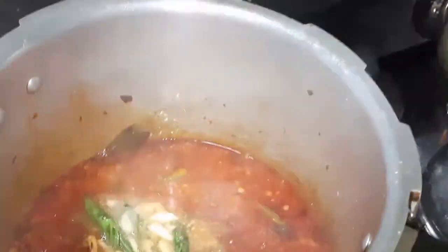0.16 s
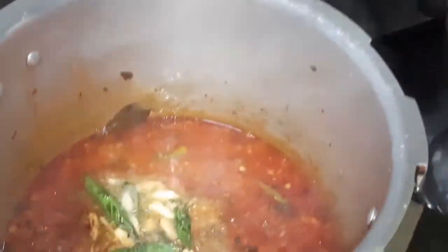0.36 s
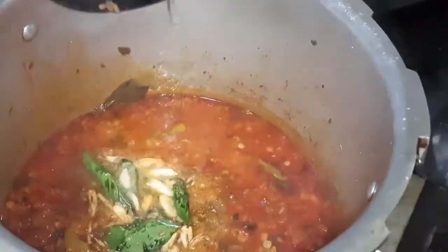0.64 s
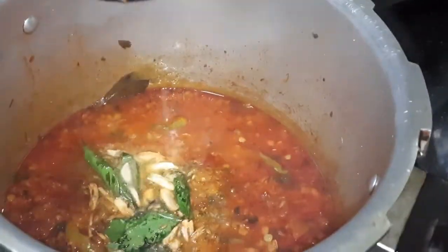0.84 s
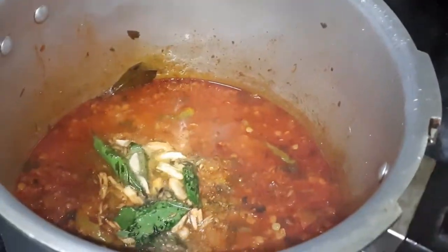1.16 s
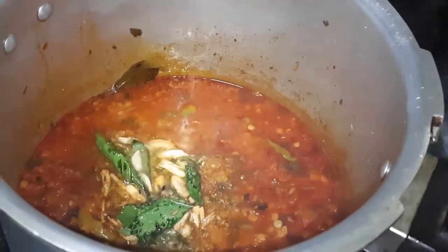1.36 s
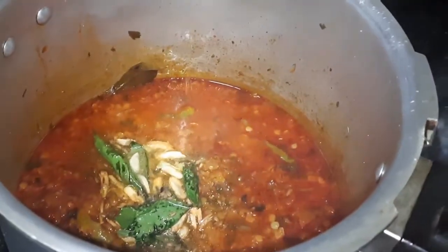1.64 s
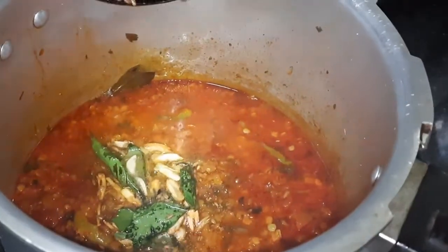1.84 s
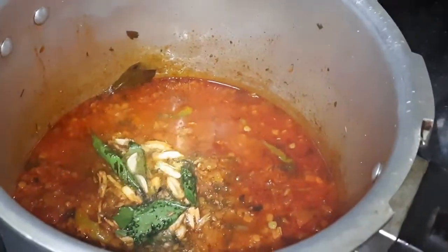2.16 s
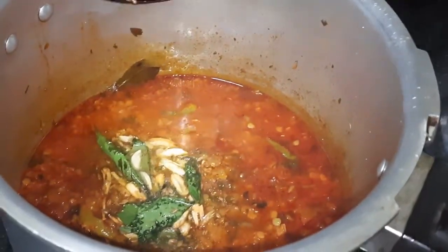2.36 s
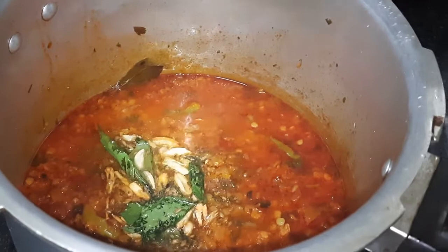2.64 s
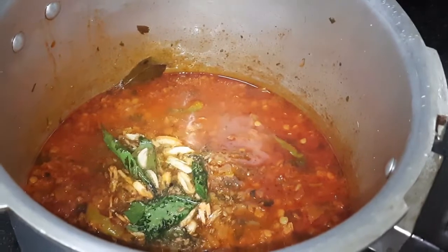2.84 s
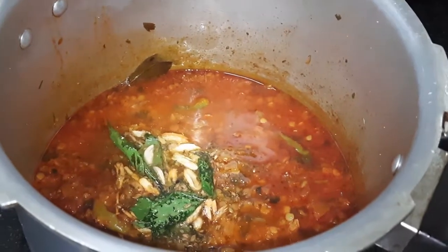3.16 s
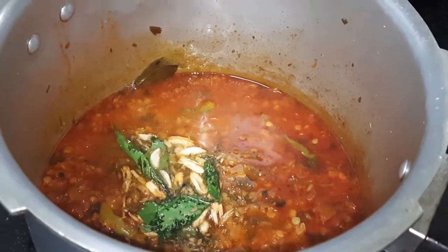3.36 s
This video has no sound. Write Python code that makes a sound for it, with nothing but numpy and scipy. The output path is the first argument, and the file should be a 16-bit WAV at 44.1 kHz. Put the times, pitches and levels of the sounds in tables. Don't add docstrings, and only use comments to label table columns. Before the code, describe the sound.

Hot oil hits wet lentils in a deep metal pot with a loud, bright sizzle, weakening steadily into scattered crackles and tiny pops; a light tap on the pot midway, close phone microphone, quiet home kitchen.

```python
import sys
import numpy as np
from scipy import signal
from scipy.fft import rfft, irfft, next_fast_len
from scipy.io import wavfile
from scipy.ndimage import uniform_filter1d, map_coordinates

SR = 44100
rng = np.random.default_rng(int(sys.argv[2]) if len(sys.argv) > 2 else 0)


def inscribe(sig):
    pcm = np.round(np.clip(np.atleast_2d(sig).T, -1, 1) * 32767)
    wavfile.write(sys.argv[1], SR, pcm.astype(np.int16))


def decibels_to_gain(level_db):
    exponent = np.asarray(level_db, float) / 20
    return 10 ** exponent


N = 154350


def unit(x):
    return x / np.sqrt(np.mean(x ** 2) + 1e-20)


def along(points, hz):
    f, v = np.transpose(points)
    return np.interp(np.log(hz + 1), np.log(f + 1), v)


def wobble(rate):
    knots = rng.standard_normal(int(N * rate / SR) + 4)
    return map_coordinates(knots, [np.arange(N) * rate / SR])


def coloured(x, points, peaks=()):
    m = 2 * next_fast_len(N // 2 + SR // 4)
    hz = np.fft.rfftfreq(m, 1 / SR)
    resonances = sum(decibels_to_gain(2 * db) / (1 + (2 * (hz - c) / w) ** 2) for c, w, db in peaks)
    gain = decibels_to_gain(along(points, hz)) * np.sqrt(1 + resonances)
    cepstrum = irfft(np.log(gain + 1e-7), m)
    cepstrum = np.concatenate([cepstrum[:1], 2 * cepstrum[1:m // 2], np.zeros(m // 2)])
    return irfft(rfft(x, m) * np.exp(rfft(cepstrum)), m)[..., :N]


# (time [s], fizz level [dB], large bursts over the fizz [dB], low glug over the fizz [dB])
BOIL = [(0, -31.5, -11, -24), (.1, -31.5, -12.5, -26), (.3, -32.5, -12, -26), (.5, -34.5, -14.5, -33),
        (.7, -33.5, -16, -32), (.85, -33.5, -14, -27.5), (1.05, -36, -16.5, -32), (1.3, -39, -23, -28),
        (1.6, -41.5, -23.5, -29), (1.761, -45, -22, -25.5), (1.86, -44.5, -16.5, -23),
        (2.02, -45.5, -28, -27), (2.35, -51.5, -21, -22), (2.47, -51.5, -33, -27),
        (2.62, -52.5, -21, -27.5), (2.8, -56, -19.5, -23.5), (3.1, -60, -19, -21), (3.5, -65, -23, -17.5)]
# (frequency [Hz], spectral density [dB per Hz])
GURGLE_COLOUR = [(700, -31), (1000, -14.5), (1600, -8), (2300, -4.5), (2880, -4.5), (3500, -3), (6000, -6),
                 (14000, -70)]
# (frequency [Hz], spectral density [dB per Hz])
GLUG_COLOUR = [(200, -16.5), (400, -2.5), (600, -7.5), (800, -8), (1300, -9.5), (2500, -37.5)]
# (frequency [Hz], width [Hz], level over the burst [dB])
POT = [(475, 22, 12), (575, 30, 14), (650, 45, 8), (950, 50, 7), (1225, 50, 11), (1950, 40, 11),
       (2070, 45, 8), (2345, 35, 13), (2600, 55, 11), (3300, 80, 6), (3720, 55, 8)]


def sizzle():
    s, *controls = np.transpose(BOIL)
    level_db, large_db, glug_db = (np.interp(np.arange(N) / SR, s, c) for c in controls)
    level_db = level_db + 0.5 * wobble(8.24) + 0.32 * wobble(29.98)
    large_db = large_db + 0.6 * wobble(11.6)

    bead_share = 0.12
    steam = bursts(per_s=2500, spread_db=-3.5, share=0.23, patchy_db=0.64)
    steam = steam + np.sqrt(bead_share) * beads()
    fizz = oil_colour(unit(steam), [(c, w, db - 5.5) for c, w, db in POT])

    large = bursts(per_s=500, spread_db=-3, share=0.22, patchy_db=1.2)
    gurgle = unit(coloured(large, GURGLE_COLOUR, POT))

    slow = bursts(per_s=200, spread_db=6.5, share=0.08, patchy_db=1.0)
    glug = unit(coloured(slow, GLUG_COLOUR, POT))
    return decibels_to_gain(level_db) * (fizz + decibels_to_gain(large_db) * gurgle + decibels_to_gain(glug_db) * glug)


def bursts(per_s, spread_db, share, patchy_db):
    chance, size, sign = rng.random(N), rng.exponential(1, N), rng.standard_normal(N)
    shots = (chance < per_s / SR) * decibels_to_gain(spread_db * np.minimum(size, 4)) * sign
    steam = np.sqrt(share) * unit(shots) + np.sqrt(1 - share) * rng.standard_normal(N)
    z = signal.stft(steam, nperseg=256)[2]
    field = uniform_filter1d(rng.standard_normal(z.shape), size=8, axis=0)
    field = uniform_filter1d(field, size=6, axis=1)
    return signal.istft(z * decibels_to_gain(patchy_db * unit(field)), nperseg=256)[1][:N]


def beads():
    count = round(2200 * N / SR)
    when, pitch, size = rng.random(count), rng.standard_normal(count), rng.exponential(1, count)
    hz = np.clip(7000 * np.exp(0.4 * pitch), 2000, 14000)[:, None]
    k = np.arange(SR // 200)
    turns = hz * k / SR
    envelope = np.exp(-turns / 10) * (1 - np.exp(-turns))
    ring = decibels_to_gain(2.4 * np.minimum(size, 3))[:, None] * np.sin(2 * np.pi * turns) * envelope
    place = (when * N).astype(int)[:, None] + k
    return unit(np.bincount(place.ravel(), ring.ravel())[:N])


# (frequency [Hz], spectral density [dB per Hz])
HOT_OIL = [(1470, -31), (2500, -24), (2930, -19), (3750, -8.5), (4110, -9.5), (6900, -5.5), (7570, -5),
           (9370, 4), (15500, -15)]
# (frequency [Hz], spectral density [dB per Hz])
COOL_OIL = [(1500, -34), (2500, -33), (3900, -15.5), (6000, -11), (9300, 0), (11300, -6.5), (11900, -22),
            (15600, -26)]


def oil_colour(x, peaks=()):
    half_way_s, cooling_s = 2.44, 0.24
    cooled = 1 / (1 + np.exp((half_way_s - np.arange(N) / SR) / cooling_s))
    pair = np.array([x, rng.standard_normal(N)])
    hot, cool = (coloured(pair, colour, peaks) for colour in (HOT_OIL, COOL_OIL))
    return (1 - cooled) * hot[0] / hot[1].std() + cooled * cool[0] / cool[1].std()


# (time [s], crack peak [dB], crackle under the crack [dB], decay time [s])
SPITS = [(0.3865, -21, -10, 0.028), (0.638, -31, -30, 0.0057), (1.234, -28.5, -11, 0.022),
         (1.2996, -26, -11, 0.015), (1.406, -28, -9, 0.012), (1.5569, -20.5, -13, 0.0082),
         (1.798, -38.5, -0.5, 0.041), (1.8694, -34.5, -5.5, 0.011), (1.93, -27.5, -18, 0.029),
         (2.1411, -31, -6, 0.017), (2.508, -24, -19, 0.052), (2.5439, -29, -8, 0.019),
         (2.575, -44.5, -1, .04), (2.6594, -41, -21, 0.009), (2.7376, -42.5, -6.5, 0.015),
         (2.8032, -36, -35.5, 0.015), (2.9612, -33.5, -26, 0.014), (3.012, -40, -25, 0.013),
         (3.0338, -41, -19, 0.021), (3.077, -38, -14, 0.017), (3.149, -43.5, -12, 0.021),
         (3.283, -46, -12, 0.0079), (3.346, -39, -20, 0.01), (3.4345, -47, -15, 0.013)]
# (frequency [Hz], level [dB])
SPIT_TILT = [(1500, 2), (3800, 2), (5500, 4), (8500, 0), (15000, 1.5)]


def spits():
    x, t = np.zeros(N + SR), np.arange(SR // 5) / SR
    crack = 0.7 * np.cos(2 * np.pi * 9200 * t) * np.exp(-t / 0.0003)
    for s, db, crackle_db, decay_s in SPITS:
        noise = rng.standard_normal(len(t))
        steps_db = 4 * rng.standard_normal(len(t) // 30 + 1)
        crackle = noise * decibels_to_gain(steps_db.repeat(30)[:len(t)]) * np.exp(-t / decay_s)
        x[round(s * SR):][:len(t)] += decibels_to_gain(db) * (crack + decibels_to_gain(crackle_db) * crackle)
    return decibels_to_gain(-5.5) * oil_colour(coloured(x[:N], SPIT_TILT), [(c, w, db - 5) for c, w, db in POT])


# (time [s], peak level [dB], frequency [Hz])
POPS = [(0.2825, -37, 4750), (0.3877, -23, 6900), (0.3873, -20, 9100), (0.4157, -20, 10400),
        (0.5564, -19.5, 9500), (0.6399, -13.5, 10100), (1.027, -18.5, 9000), (1.101, -20, 10100),
        (1.184, -29, 6740), (1.4083, -30, 6800), (1.4508, -20, 10100), (1.4637, -25, 10300),
        (1.4645, -33, 5150), (1.4888, -23, 10300), (1.562, -20, 11200), (1.611, -36, 8800),
        (1.651, -30, 10000), (1.8073, -34, 7200), (1.936, -32, 6400), (2.0873, -33, 9600),
        (2.146, -36, 9400), (2.219, -30, 9100), (2.227, -37, 6000), (2.2342, -30, 10200), (2.27, -42, 5900),
        (2.3249, -44, 6900), (2.3978, -39, 10100), (2.438, -47, 7100), (2.5106, -38, 7100),
        (2.5466, -33, 5940), (2.5518, -33, 9700), (2.598, -40, 7000), (2.6607, -42, 9100),
        (2.7384, -46, 6900), (2.7397, -44, 9200), (2.803, -45, 6660), (2.8553, -52, 6400),
        (2.8936, -48, 5000), (2.9317, -39, 9600), (2.9387, -44, 9000), (2.9553, -48, 6500),
        (3.0334, -46, 6100), (3.0631, -50, 9100), (3.0764, -45, 6170), (3.0986, -49, 6700),
        (3.1296, -44, 8700), (3.1489, -55, 7100), (3.1778, -42, 9100), (3.1947, -48, 9200),
        (3.2415, -49, 6300), (3.2777, -43, 9200), (3.2852, -43, 9000), (3.3452, -53, 6300),
        (3.4037, -49, 7100), (3.4337, -60, 7300), (3.4571, -49, 7200), (3.4835, -47, 9000),
        (3.4837, -41.5, 6000), (3.4892, -57, 6000), (3.4892, -50, 8800)]


def pops():
    x, t = np.zeros(N + SR), np.arange(SR // 100) / SR
    for s, db, hz in POPS:
        envelope = np.exp(-hz * t / 5) * (1 - np.exp(-2 * hz * t))
        x[round(s * SR):][:len(t)] += decibels_to_gain(db - 0.5) * np.sin(2 * np.pi * hz * t) * envelope
    return x[:N]


# (time [s], level [dB], frequency [Hz], length [s], width [Hz])
BUBBLES = [(.01, -50.5, 575, 0.1, 90), (.01, -50.5, 950, 0.087, 150), (0.719, -31, 4410, 0.021, 1800),
           (0.736, -29, 2400, 0.016, 650), (0.764, -37, 2300, 0.014, 400), (0.806, -38, 3330, 0.011, 595),
           (1.297, -49, 3960, 0.023, 900), (1.267, -60, 2355, 0.13, 45), (1.655, -53, 2360, 0.025, 120),
           (1.738, -55, 2330, 0.02, 120), (1.792, -61, 2620, .08, 60), (1.797, -55.5, 2360, 0.087, 79),
           (2.143, -60, 2595, .018, 199), (2.545, -61, 3700, .008, 500), (2.546, -62, 2400, 0.013, 400)]


def bubbles():
    x, t = np.zeros(N + SR), np.arange(SR // 2) / SR
    for s, db, hz, length, width_hz in BUBBLES:
        shape = 4 * (t / length) ** 1.3 * np.exp(-2.2 * t / length)
        blur = np.hanning(int(2 * SR / max(width_hz, 30)))[None]
        a, b = signal.fftconvolve(rng.standard_normal((2, len(t))), blur, 'same', axes=1)
        froth = shape * (a * np.sin(2 * np.pi * hz * t) + b * np.cos(2 * np.pi * hz * t))
        level = decibels_to_gain(db) * np.linalg.norm(shape) / np.linalg.norm(froth) / np.sqrt(2)
        x[round(s * SR):][:len(t)] += level * froth
    return x[:N]


# (time [s], level [dB])
TICKS = [
    (1.788, -21),
    (1.835, -28),
    (2.9805, -33),
]
# (frequency [Hz], level [dB])
TICK_COLOUR = [(200, -14), (900, -8), (2000, 0), (3200, 0), (4500, -6), (7000, -20), (15000, -35)]


def ticks():
    x = np.zeros(N)
    for s, db in TICKS:
        x[round(s * SR)] = decibels_to_gain(db)
    return coloured(x, TICK_COLOUR, [(c, w, db - 7) for c, w, db in POT])


# (frequency [Hz], level [dB])
ECHO_COLOUR = [(3000, -30), (5000, 0), (16000, 0)]


def walls(x):
    echo_db, t60_s = -9, 0.1
    t = np.arange(SR // 5) / SR
    tail = rng.standard_normal(len(t)) * decibels_to_gain(-60 * t / t60_s) * (t > 0.001)
    echo = signal.fftconvolve(coloured(x, ECHO_COLOUR), tail / np.linalg.norm(tail))[:N]
    return x + decibels_to_gain(echo_db) * echo


# (frequency [Hz], spectral density [dB per Hz])
KITCHEN = [(12, -47), (24, -9), (70, -7.5), (101, 2), (217, -8), (367, -9), (458, -16), (775, -15),
           (2500, -22.5), (3250, -66), (5500, -120)]
# (frequency [Hz], width [Hz], level [dB])
ROOM_MODES = [(41.6, 8.3, 11.5), (78, 16.2, 14.5), (158, 12.4, 12), (207, 30, 10.5)]
# (time [s], frequency [Hz], level [dB], length [s])
SWELLS = [(0.565, 158, -73.5, 0.11), (1.14, 81.4, -66, .1), (1.19, 158, -67, 0.031),
          (1.322, 158, -58, 0.053), (1.508, 78, -70, 0.093), (1.765, 158, -64.5, 0.077),
          (1.992, 158, -64.5, 0.11), (2.373, 148.3, -55, 0.037), (2.55, 215, -71, 0.19),
          (3.103, 71.6, -76, 0.23), (2.57, 76.3, -61.5, 0.086), (2.703, 78.9, -60, 0.052),
          (2.734, 158, -63.5, 0.072), (2.964, 293, -72, 0.033), (3.35, 80.9, -65, .12)]


def kitchen():
    t = np.arange(N) / SR
    hum = unit(coloured(rng.standard_normal(N), KITCHEN, ROOM_MODES)) * decibels_to_gain(wobble(5.05))
    x = decibels_to_gain(-65.5) * hum + decibels_to_gain(-78) * rng.standard_normal(N)
    for s, hz, db, length in SWELLS:
        phase = 2 * np.pi * hz * t + 0.6 * wobble(10)
        x += decibels_to_gain(db) * np.exp(-((t - s) / length) ** 2) * np.sin(phase)
    return x


def scene():
    pot = walls(sizzle() + spits() + bubbles() + pops() + ticks())
    mono = pot + kitchen()
    return np.array([mono, mono])


def roll_off(x):
    return signal.sosfilt(signal.butter(12, 15660, fs=SR, output="sos"), x)


# (time [s], chance that a top band drops out)
DROPOUTS = [(.6, 0), (.72, .35), (.95, .2), (1.08, .9), (1.15, .5), (1.25, 1.1), (1.45, .6), (1.8, 1),
            (1.92, .6), (2.06, 1.4), (2.15, .4), (2.3, 1), (2.5, .3), (2.62, .7), (2.78, .5), (2.85, .08),
            (3.5, .05)]
BAND_RISK = [.25, .25, .9, .65, .85, .95]


def record(dry):
    band_hz, first_band_hz, edge_hz, frame = 750, 11250, 70, 941
    hz, t, z = signal.stft(dry[0], SR, nperseg=2 * frame)
    band = np.clip((hz - first_band_hz) // band_hz, -1, len(BAND_RISK) - 1).astype(int)
    chance = np.outer([*BAND_RISK, 0], np.interp(t, *np.transpose(DROPOUTS)))
    luck = rng.random((3, *chance.shape))
    fresh = np.maximum.accumulate(np.where(luck[1] < 0.7, np.arange(len(t)), 0), axis=1)
    out = (np.take_along_axis(luck[0], fresh, axis=1) < chance)[band]
    edge = ((first_band_hz - hz) % band_hz < edge_hz)[:, None]

    mid = z * np.where(out & ~edge, 0, 1)
    leak = (luck[2] < 0.35 * chance)[band] * ~out
    left_or_right = np.sign(luck[1] - 0.5)[band]
    side = decibels_to_gain(8.5) * z * ((out & edge) + 0.5 * leak) * left_or_right
    pair = signal.istft(np.array([mid + side, mid - side]), SR, nperseg=2 * frame)[1][:, :N]
    return roll_off(pair)


dry = scene()
out = record(dry)
inscribe(out)
```